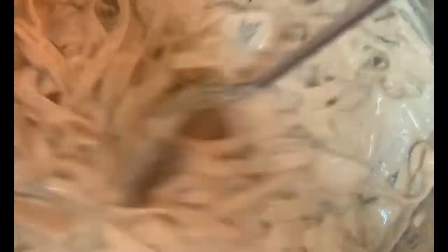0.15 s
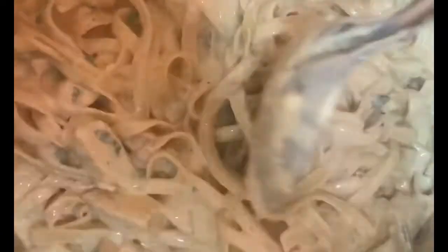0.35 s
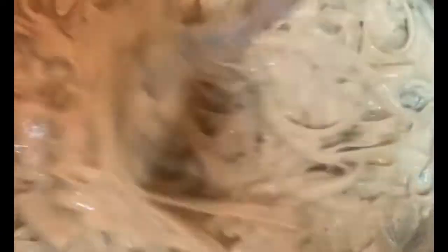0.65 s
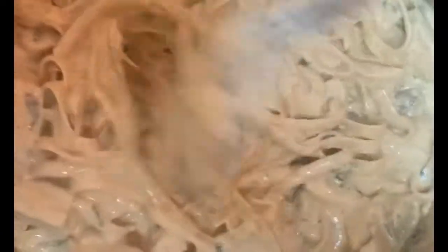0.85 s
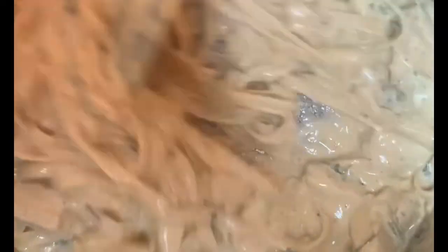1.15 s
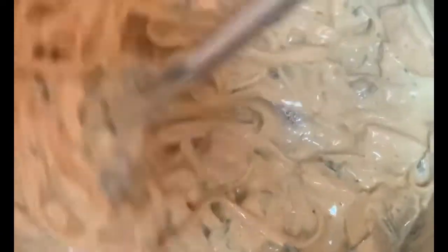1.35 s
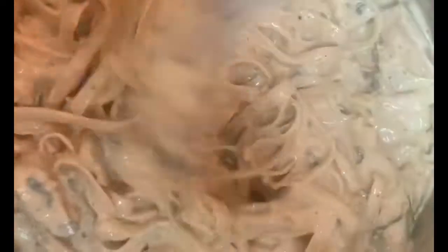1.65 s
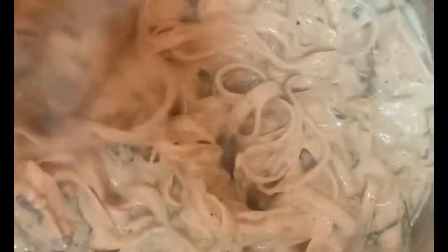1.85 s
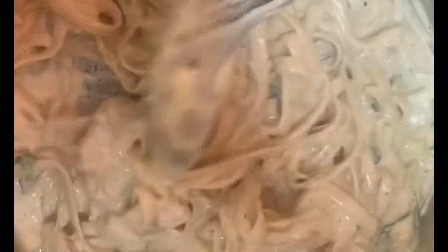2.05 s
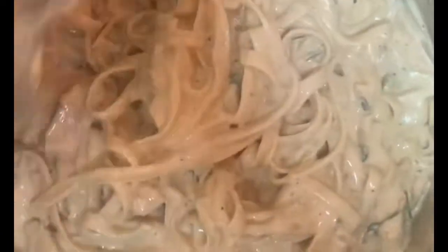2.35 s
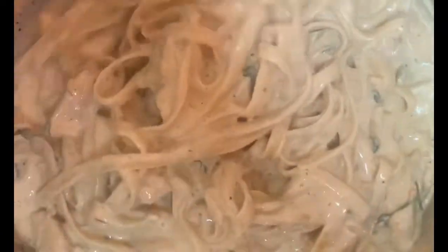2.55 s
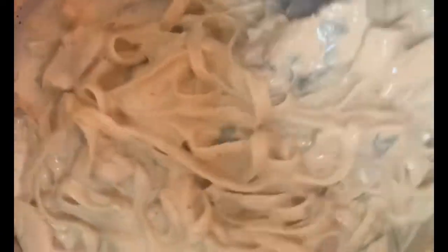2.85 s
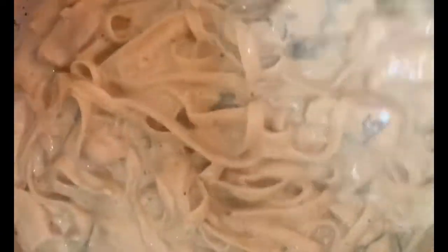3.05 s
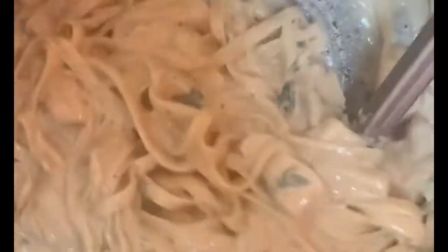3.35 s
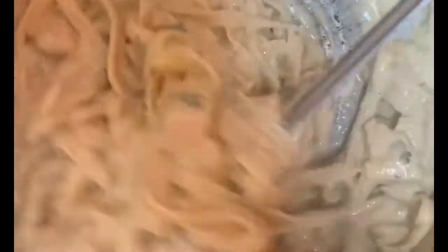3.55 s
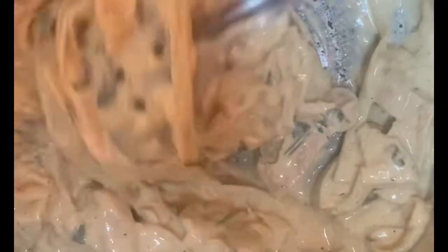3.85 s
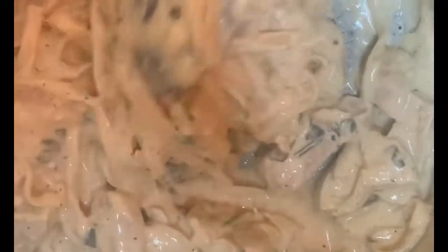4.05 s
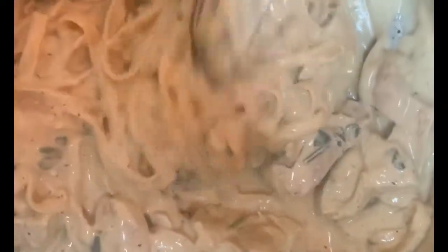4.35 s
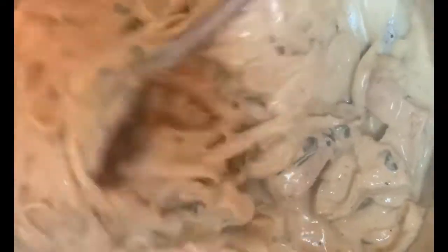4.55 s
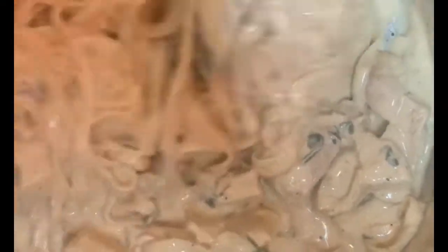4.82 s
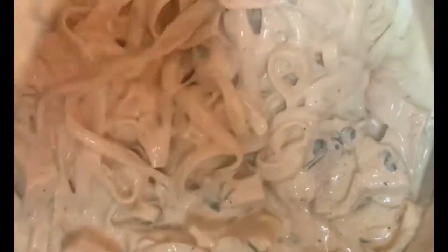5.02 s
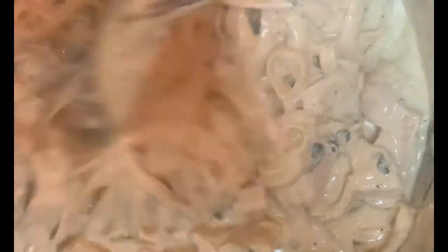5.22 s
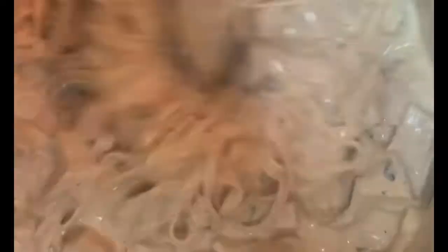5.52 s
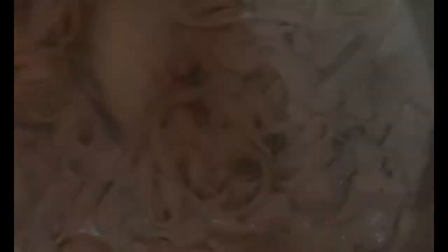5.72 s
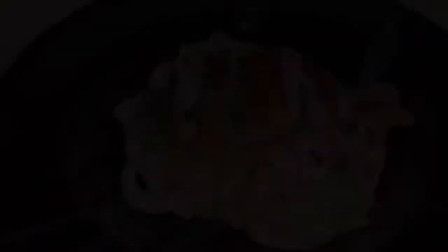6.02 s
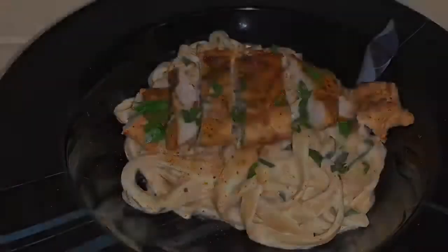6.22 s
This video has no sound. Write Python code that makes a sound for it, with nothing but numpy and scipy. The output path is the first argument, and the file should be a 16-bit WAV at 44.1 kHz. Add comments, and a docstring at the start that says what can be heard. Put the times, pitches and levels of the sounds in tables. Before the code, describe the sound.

Close-up stirring of saucy noodles: soft scrapes, faint fizzing and crackles, one hard metal knock, all above a low humming kitchen fan.

```python
"""Cream pasta under the cooker hood

A small kitchen, two microphone ports close to the pan: a steel spoon stirs pasta through simmering cream.
Blows ring pan and steel as decaying sines; scrapes are dense random slips through filters and resonances.
Swarms of gliding bubbles, ticks and noise make the sauce fizz, snap and squelch.
Behind, the hood hums and whines in wavering tones over filtered air noise.
The room answers with a short noise tail, and everything is faded to silence just before the end."""
import sys
import numpy as np
from scipy import signal
from scipy.fft import rfft, irfft
from scipy.io import wavfile
from scipy.ndimage import uniform_filter1d, map_coordinates

SR = 44100
rng = np.random.default_rng(int(sys.argv[2]) if len(sys.argv) > 2 else 0)


def master_out(mix):
    """Clip the mix to full scale and print it as 16-bit PCM to the path in sys.argv[1]."""
    frames = np.transpose(np.atleast_2d(mix))
    ceiling = np.clip(frames, -1, 1)
    pcm = np.round(ceiling * 32767).astype(np.int16)
    wavfile.write(sys.argv[1], SR, pcm)


N = 281177
TIME = np.arange(N) / SR
FREQ = np.fft.rfftfreq(N, 1 / SR)


def undb(db):
    """Decibels to gain."""
    return 10 ** (np.asarray(db) / 20)


def unit(x):
    """Scale to a standard deviation of 1."""
    return x / np.std(x)


def colour(x, spectrum):
    """Shape a sound by (f/Hz, level/dB) points, joined along a logarithmic frequency axis."""
    hz, db = np.transpose(spectrum)
    gain = undb(np.interp(np.log(FREQ + 1), np.log(hz), db))
    return irfft(rfft(x) * gain, N)


def resonate(x, hz, width):
    """Two-pole band-pass, as one damped resonance."""
    return signal.lfilter(*signal.iirpeak(hz, hz / width, fs=SR), x)


def walk(rate):
    """Smoothed random wandering with a spread of 1, drawn anew about `rate` times a second."""
    size = int(SR / rate)
    steps = np.repeat(rng.standard_normal(N // size + 1), size)
    return unit(uniform_filter1d(steps, size)[:N])


def drift(x, share, rate):
    """Let the pitch wander by a small share, by reading the sound at a varying speed."""
    speed = walk(rate)
    lead = np.cumsum(speed - uniform_filter1d(speed, SR // 4)) * share
    return map_coordinates(x, [np.arange(N) + lead], order=1)


def add(track, s, sound):
    """Mix a short sound in at time s."""
    i = int(s * SR)
    track[i:i + len(sound)] += sound[:N - i]


def decay(t, t60):
    """Exponential decay that falls 60 dB in t60 seconds."""
    return np.exp(-np.log(1000) * t / t60)


def ring(modes, crack, crack_t60, low_hz, top_hz):
    """A tapped body answers with decaying modes and a brief crack of dense, band-limited noise."""
    t = TIME[:SR // 3]
    tones = 0
    for k, (hz, db, t60) in enumerate(modes):
        sign = (-1) ** k
        tones = tones + sign * undb(db) * np.sin(2 * np.pi * hz * t) * decay(t, t60)
    band = signal.butter(3, [low_hz, top_hz], "band", fs=SR, output="sos")
    noise = unit(signal.sosfilt(band, rng.standard_normal(len(t))))
    return tones + crack * noise * decay(t, crack_t60)


def bubble(hz, cycles, glide):
    """A bubble rings down over about `cycles` periods while its pitch rises by the share `glide`."""
    age = np.linspace(0, 1, int(cycles * SR / hz) + 4)
    phase = 2 * np.pi * cycles * (age + glide * age ** 2 / 2)
    return np.sin(phase) * np.exp(-np.log(300) * age)


def bubbles(count, low_hz, high_hz, cycles, spread_db, glide):
    """A swarm of bubbles at random times and pitches, many faint and a few loud."""
    out = np.zeros(N)
    for when, pitch, size, life in rng.random((count, 4)):
        big_db = -spread_db * np.log(size + .01)
        hz = low_hz * (high_hz / low_hz) ** pitch
        add(out, when * TIME[-1], undb(big_db) * bubble(hz, cycles * (.5 + life), glide))
    return out


# spoon meets pan, levels before softening:
# (t/s, pan level/dB, steel level/dB, brightness cutoff f/Hz, time constant of food and hand muting the steel/s)
BLOWS = [(0.9012, -16, -18.5, 3800, .008), (1.085, -18, -26, 2400, .01), (1.256, -13, -27, 2600, .01),
         (1.276, -14.5, -24.5, 3200, .01), (1.325, -17.5, -31, 2000, .01), (1.346, -16, -36, 2000, .01),
         (1.381, -20.5, -30, 2500, .01), (1.8012, 7.5, -6, 9100, 0.006), (2.2025, -9, 1, 14100, 0.2),
         (2.2843, -13.5, -22.5, 2030, .01), (2.2982, -14.5, -12.5, 8000, .014),
         (2.305, -11, -15.5, 3000, .008), (2.323, -17.5, -21.5, 3000, .006),
         (2.3755, -17, -32, 4000, 0.0088), (2.387, -14, -28, 3050, .008), (2.445, -24, -20, 9000, .004),
         (2.4915, -21, -14, 9000, 0.0053), (2.517, -16, -35, 5000, .005), (2.654, -18, -20.5, 5000, .01),
         (2.672, -20.5, -27.5, 2200, .008), (2.688, -19, -30, 2200, .008), (2.71, -19, -26.5, 2500, .008),
         (3.2218, -10, -13, 12000, 0.0081), (3.715, -14.5, -15, 2600, 0.018),
         (5.1477, -16.5, -38, 1990, .01)]
# the pan, damped by its load: (f/Hz, level/dB, t60/s)
PAN_MODES = [(606, -31, 0.15), (721, -20.5, 0.075), (1020, -19, 0.02), (1135, -17.5, 0.032),
             (1263, -21, 0.04), (1556, -22, 0.078), (1658, -20, 0.046), (1750, -18.5, 0.025),
             (2140, -28.5, .025), (2780, -35.5, 0.055), (3270, -29.5, 0.021), (3920, -24, 0.031)]
# bare steel, before muting: (f/Hz, level/dB, t60/s)
STEEL_MODES = [(604, -38, 0.13), (1039, -30.5, 0.11), (1240, -35, .18), (1400, -26.5, 0.1),
               (1590, -31.5, .1), (1940, -34, .15), (2400, -19.5, 0.17), (2460, -23.5, 0.035),
               (3070, -24.5, .05), (3300, -30, 0.33), (4220, -17.5, 0.08), (4256, -23, 0.09),
               (4500, -21, 0.066), (4630, -19, .09), (5200, -23, 0.058), (5200, -22, .04),
               (5483, -18.5, 0.11), (6550, -15, 0.076), (6735, -19.5, .05), (6900, -19, 0.059),
               (7920, -24.5, 0.12), (8100, -24, 0.035), (8650, -25, .045), (9100, -23, 0.04),
               (10250, -26.5, 0.055), (11140, -30, .05), (11900, -30, .04), (13710, -27.5, 0.035),
               (14850, -25.5, .04)]
# single resonances of pan and spoon that ring on: (t/s, f/Hz, level/dB, t60/s)
RINGS = [(1.087, 611, -24, 0.25), (1.086, 1660, -28.5, 0.029), (1.256, 720, -18.5, 0.0516),
         (2.5, 2331, -24.5, 0.11), (2.5, 2850, -21.5, 0.053), (2.298, 4690, -26, 0.1003),
         (2.654, 910, -23.5, 0.075), (3.223, 850, -36, 0.23), (3.717, 1632, -38.5, 0.45),
         (3.716, 872, -19, 0.033), (3.716, 2000, -29, 0.093), (3.716, 2724, -33, 0.11),
         (3.715, 3700, -26, .028), (3.716, 4150, -27, .07)]
BOUNCE_S, BOUNCE_DB = .0036, -12  # delay and level of the one bounce, relative to its blow


def knocks():
    """Each blow clicks and rings pan and steel; food dulls it and mutes the steel; a weak bounce follows."""
    out, t = np.zeros(N), TIME[:SR // 2]
    for s, pan_db, steel_db, bright_hz, mute_s in BLOWS:
        click = ring([], crack=.11, crack_t60=.014, low_hz=1800, top_hz=9500)
        pan = click + ring(PAN_MODES, crack=0.1, crack_t60=0.06, low_hz=650, top_hz=2200)
        steel = ring(STEEL_MODES, crack=0.18, crack_t60=0.042, low_hz=1702, top_hz=14000)
        muted = steel * np.exp(-TIME[:len(steel)] / mute_s)
        soft = signal.butter(1, min(bright_hz, SR * .45), fs=SR)
        blow = signal.lfilter(*soft, undb(pan_db) * pan + undb(steel_db) * muted)
        add(out, s, blow)
        add(out, s + BOUNCE_S, undb(BOUNCE_DB) * blow)
    for s, hz, db, t60 in RINGS:
        add(out, s, undb(db) * np.sin(2 * np.pi * hz * t) * decay(t, t60))
    return out


PRESS_S = 0.017  # the spoon bears down this long before a stroke's start


def pressure(start, hold, ease):
    """Force of one stroke: the spoon bears down, holds and eases off exponentially."""
    onset = np.clip(1 + (TIME - start) / PRESS_S, 0, 1)
    return onset * np.exp(-np.maximum(TIME - start - hold, 0) / ease)


# strokes of the spoon: (start t/s, hold/s, time constant of easing off/s,
# rubbing through food level/dB, gritty steel contact level/dB, singing of the pressed metal level/dB)
STROKES = [(.005, 0.046, 0.046, -33, -55, -56), (1.083, .03, .035, -44, -58, -54),
           (1.256, 0.11, .03, -37.5, -51.5, -51), (1.79, 0.031, 0.02, -42, -39.5, -37.5),
           (2.229, 0.04, .025, -40, -40, -41), (2.301, 0.026, 0.037, -32, -38, -43),
           (2.42, .125, 0.048, -37.5, -34.5, -34.5), (2.559, 0.044, 0.016, -39, -35.5, -28.5),
           (2.648, 0.062, .06, -33.5, -46, -41.5), (2.995, 0.09, 0.081, -39.5, -50.5, -48.5),
           (3.715, .05, 0.04, -51, -52, -49), (4.51, .04, .03, -45, -58, -62),
           (5.128, 0.048, 0.03, -40.5, -58, -58), (5.295, 0.041, .04, -42, -55, -57)]
# resonances of spoon and pan pressed together: (f/Hz, width/Hz, mean level/dB relative to each other)
PRESSED = [(1054, 40, -4), (1250, 27, 3.5), (1494, 70, -6), (1690, 40, -5.5), (1943, 20, 1),
           (2424, 22, -8.5), (2723, 14, 1), (2900, 25, -2.5), (3015, 16, 2), (3250, 25, -9), (3413, 98, -3),
           (3575, 31, -0.5), (3990, 50, -1), (4100, 60, -4), (5200, 80, -9.5), (5130, 70, -4.5),
           (5670, 40, -3.5), (5950, 60, -3), (6300, 40, -5.5), (7000, 110, -2), (8300, 67, -3),
           (10400, 200, -4.5)]
# colour of the gritty contact: (f/Hz, relative level/dB)
GRIT = [(500, -13), (1500, 9), (3200, 6), (4400, 4.5), (5300, 6.5), (6700, 10), (7500, 4.5), (8300, -8.5),
        (9500, -2), (11000, 2), (12500, 2), (15500, -9)]
# colour of rubbing through food: (f/Hz, relative level/dB)
RUB = [(200, -7), (330, 10), (500, 13), (900, 4.5), (1150, 2.5), (1450, 5.5), (2000, 0), (3000, -12.5),
       (6000, -28), (16000, -27.5)]
SLIPS_PER_S, JUDDER_DB = 12000, 1.5  # mean slip rate; spread of the slips' wavering strength
SING_WAVER_DB, SING_DRIFT = 2.2, .003  # spread of each resonance's level; share of its pitch drift


def scrape():
    """The edge sticks and slips, bursting wet pockets; resonances waver as the contact point travels."""
    strokes = [undb(levels)[:, None] * pressure(start, hold, ease) for start, hold, ease, *levels in STROKES]
    rub, bite, sing = np.max(strokes, axis=0)  # the strongest stroke counts at each moment

    slipping = rng.random(N) < SLIPS_PER_S / SR
    slips = rng.choice([-1, 1], N) * slipping * undb(JUDDER_DB * walk(350))

    singing = np.zeros(N)
    for hz, width, db in PRESSED:
        level = undb(db + SING_WAVER_DB * walk(30))
        singing += level * unit(drift(resonate(slips, hz, width), share=SING_DRIFT, rate=25))

    chirps = bubbles(count=9000, low_hz=3516, high_hz=8970, cycles=100, spread_db=4.5, glide=.02)
    grit = unit(colour(unit(slips) + .5 * unit(chirps), GRIT))

    pockets = bubbles(count=2500, low_hz=520, high_hz=2570, cycles=8, spread_db=2.5, glide=0.12)
    wet = unit(colour(.7 * unit(slips) + .7 * unit(pockets), RUB))
    return rub * wet + bite * grit + sing * unit(singing)


# sizzle flares as the spoon uncovers hot metal: (t/s at the height, level/dB, time constant of dying away/s)
FLARES = [(0.389, -52.5, .08), (.58, -48, 0.05), (0.961, -48, .08), (1.06, -50, .08), (1.39, -45.5, .08),
          (1.85, -56, 0.073), (2.27, -34.5, .03), (2.335, -33.5, .012), (3.039, -50.5, 0.065),
          (3.611, -50.5, .08), (3.78, -47.5, .06), (4.381, -46, .08), (4.68, -49.5, .08), (5.1, -50.5, .08),
          (5.439, -47, .08), (5.81, -47, .08)]
FLARE_RISE_S = 0.035  # time constant of swelling
SIMMER_DB = -52.5  # steady part of the boiling strength


def sizzle():
    """Strength of the boiling: a steady simmer and swelling flares, summed as powers."""
    power = undb(SIMMER_DB) ** 2
    for s, db, fall_s in FLARES:
        shape = np.exp(-np.maximum((s - TIME) / FLARE_RISE_S, (TIME - s) / fall_s))
        power = power + (undb(db) * shape) ** 2
    return np.sqrt(power)


# colour of the fizz: (f/Hz, relative level/dB)
FIZZ = [(500, -28.5), (2000, 0), (3800, 9), (6000, -5), (7500, -2.5), (10600, 2.5), (11100, -2),
        (13000, -1.5), (15500, -7)]
# colour of the squelching: (f/Hz, relative level/dB)
SQUELCH = [(200, -6.5), (480, 16), (900, 8), (1150, -4.5), (1500, -2), (2000, 5), (3000, -19),
           (6000, -28.5), (16000, -27.5)]


def sauce(boil):
    """Tiny steam bubbles hiss, bigger ones crackle in spurts; air pockets squelch and plop between noodles."""
    ticks = bubbles(count=3000, low_hz=4400, high_hz=13300, cycles=20, spread_db=3.0, glide=.06)
    spurts = undb(6 * walk(30))
    bursts = rng.random(N) < 350 * spurts / SR
    strength = undb(4.5 * np.minimum(rng.exponential(size=N), 4))
    crackle = bursts * rng.choice([-1, 1], N) * strength
    hiss = rng.standard_normal(N)
    fizz = unit(colour(unit(ticks) + 0.7 * unit(crackle) + 1.1 * hiss, FIZZ))
    fizzing = fizz * boil * undb(2.5 + 0.84 * walk(25))

    squelch = bubbles(count=2400, low_hz=570, high_hz=3000, cycles=2.3, spread_db=4.0, glide=0.14)
    squelching = unit(colour(squelch, SQUELCH)) * undb(-51.5 + 1.2 * walk(15))
    plops = bubbles(count=170, low_hz=376, high_hz=1400, cycles=15, spread_db=4.0, glide=.12)
    return fizzing + squelching + undb(-55) * unit(plops)


# random small snaps: middle and full range of nominal level, and range of pitch
SNAP_DB, SNAP_SPREAD_DB, SNAP_LOW_HZ, SNAP_HIGH_HZ = -42.5, 10.5, 4840, 14000


def random_snaps(boil, count):
    """Rows (t/s, nominal level/dB, f/Hz) of random small snaps, as frequent as the boiling is strong."""
    when, size, pitch = rng.random((count, 3)).T
    s = np.interp(when, np.cumsum(boil) / np.sum(boil), TIME)
    db = SNAP_DB + SNAP_SPREAD_DB * (size - .5)
    hz = SNAP_LOW_HZ * (SNAP_HIGH_HZ / SNAP_LOW_HZ) ** pitch
    return list(zip(s, db, hz))


# single snaps, ticks and small taps in the pan, loud and soft:
# (t/s, nominal level/dB before trims and low cut, f/Hz)
SINGLE_SNAPS = [(.0863, -35, 6500), (.151, -33, 8800), (0.362, -29, 10400), (0.4015, -30, 9250),
                (.5063, -33, 8060), (0.5344, -32, 7000), (.554, -34, 11500), (.5829, -27, 11540),
                (.596, -37, 11000), (.892, -31, 8700), (1.0237, -30, 7900), (1.142, -31, 11540),
                (1.2946, -41, 7500), (1.384, -28.5, 5130), (1.781, -24, 8100), (1.8883, -33, 6190),
                (1.9511, -36, 7500), (2.131, -38, 8800), (2.9737, -34, 7950), (3.068, -27, 9900),
                (3.362, -38, 12000), (3.398, -30, 9700), (3.521, -27, 3400), (3.603, -36, 12500),
                (3.627, -24.5, 2550), (3.634, -31.5, 10850), (3.7675, -32, 7500), (3.796, -32, 7600),
                (3.862, -37, 6000), (4.2888, -34, 7000), (4.32, -35, 9000), (4.352, -26, 2150),
                (4.363, -29.5, 7000), (4.391, -27, 9000), (4.4439, -34, 6300), (4.4636, -30.5, 5640),
                (4.4719, -29.5, 11100), (4.588, -32, 5800), (4.66, -39, 6500), (4.669, -31, 3150),
                (4.676, -29, 4000), (4.679, -38, 6700), (4.786, -30, 6840), (4.9354, -34.5, 6540),
                (5.036, -33, 7700), (5.1169, -35, 6000), (5.19, -31, 3760), (5.285, -31.5, 6400),
                (5.3689, -31, 12100), (5.4042, -34, 7000), (5.4322, -30, 7400), (5.45, -25, 10300),
                (5.638, -34, 7500), (5.682, -36, 7800), (5.796, -22.5, 3720), (5.813, -35, 9560),
                (5.826, -30, 5600)]
SPIT_S, SPIT_WIDTH = 0.0022, 0.38  # noisy spit: time constant; bandwidth as a share of its pitch


def snaps(boil):
    """A sharp noisy spit and a brief ring at one pitch, as when a sauce film tears and its pocket opens."""
    out, t = np.zeros(N), TIME[:SR // 40]
    for s, db, hz in SINGLE_SNAPS + random_snaps(boil, count=45):
        tear = resonate(rng.standard_normal(len(t)), hz, min(SPIT_WIDTH * hz, SR / 3))
        spit = unit(tear) * np.exp(-t / SPIT_S)
        add(out, s, undb(db - 8.0) * spit)
        add(out, s, undb(db - 0.5) * bubble(hz, cycles=34, glide=0.049))
    return signal.sosfilt(signal.butter(2, 1700, "high", fs=SR, output="sos"), out)


# spectrum of the moving air: (f/Hz, density level/dB per Hz)
HOOD_AIR = [(20, -95), (36, -76), (50, -56), (90, -49.5), (125, -49), (155, -55.5), (270, -76), (430, -73),
            (850, -75.5), (1400, -77), (2200, -78.5), (3200, -86), (6000, -90), (16000, -118)]
# duct resonances: (f/Hz, width/Hz, rms level/dB)
DUCT = [(197.2, 30.2, -34), (350, 51, -42.5), (507, 59, -49), (610.5, 16, -55), (748, 70, -46)]
# overtones of the fan wheel: (f/Hz, mean rms level/dB)
WHINE = [(366.5, -48), (612, -54.5), (732, -54)]
HUM_HZ, HUM_DB = 119.8, -27.5  # mean pitch, mean rms level
WHINE_WAVER_DB = 2.5  # spread of each overtone's level


def hood():
    """The motor hums at twice the mains rate, the fan wheel whines unsteadily; air rumbles and rings the duct."""
    air = colour(rng.standard_normal(N), HOOD_AIR) * np.sqrt(SR / 2)  # per-Hz density to full band
    duct = np.zeros(N)
    for hz, width, db in DUCT:
        stage_width = 1.48 * width  # two stages in a row narrow the band again
        once = resonate(rng.standard_normal(N), hz, stage_width)
        duct += undb(db) * unit(resonate(once, hz, stage_width))

    hum_tone = np.sqrt(2) * np.sin(2 * np.pi * HUM_HZ * TIME + 0.2 * walk(8.8))
    hum = hum_tone * undb(HUM_DB + 2.0 * walk(22))
    whine = np.zeros(N)
    for hz, db in WHINE:
        tone = np.sqrt(2) * np.sin(2 * np.pi * hz * TIME + 0.95 * walk(14))
        whine += tone * undb(db + WHINE_WAVER_DB * walk(18))
    return air + duct, hum + whine


def kitchen(x, t60, wet_db, dull_hz):
    """Direct sound plus a short diffuse tail that differs at the two ports."""
    t = TIME[:SR // 2]
    tail = rng.standard_normal((2, len(t))) * decay(t, t60) * (t > .004)  # first reflections after 4 ms
    tail = signal.lfilter(*signal.butter(1, dull_hz, fs=SR), tail / np.linalg.norm(tail[0]))
    tail = signal.sosfilt(signal.butter(3, 300, "high", fs=SR, output="sos"), tail)
    return x + undb(wet_db) * signal.fftconvolve(x[None], tail, axes=1)[:, :N]


def scene():
    """Spoon and sauce at the stove, and the hood's air, each with a room tail; hum and whine stay dry."""
    air, hum = hood()
    boil = sizzle()
    stove = kitchen(knocks() + scrape() + sauce(boil) + snaps(boil), t60=0.15, wet_db=-12.0, dull_hz=4500)
    fan = kitchen(air, t60=.3, wet_db=-3.5, dull_hz=3380) + hum
    return stove + fan


# phase by which the right microphone port lags: (f/Hz, lag/rad)
PORT_LAG = [(20, 0), (230, 0), (400, -.6), (800, -.4), (1500, .5), (3500, 1.6), (4750, 3.14), (6300, 6.2),
            (7450, 6.4), (9000, 9.4), (10650, 12.4), (11600, 12.7), (13200, 15.7), (14700, 18.7)]
# left port minus right port: (f/Hz, level/dB)
PORT_BALANCE = [(120, 1.25), (250, -2), (360, 7), (550, -0.5), (750, 5), (930, -14.5), (1100, 7),
                (1400, -1.5), (1900, 4), (2250, -1), (2400, -1.5), (2600, -0.5), (3000, 0.5), (15000, 0)]
# closing fade: (start t/s, silent t/s)
FADE = (5.869, 5.925)
TOP_HZ = 15800  # upper limit of the microphone channel


def record(dry):
    """The two ports hear out of step and differently coloured; end faded, peaks rounded, top cut."""
    lag = np.interp(FREQ, *np.transpose(PORT_LAG))
    late = irfft(rfft(dry[1]) * np.exp(-1j * lag), N)
    left = colour(dry[0], [(hz, db / 2) for hz, db in PORT_BALANCE])
    right = colour(late, [(hz, -db / 2) for hz, db in PORT_BALANCE])
    ports = np.array([left, right]) * np.interp(TIME, FADE, [1, 0])
    rounded = ports / (1 + (ports / .92) ** 4) ** .25
    return signal.sosfilt(signal.ellip(10, .2, 80, TOP_HZ, fs=SR, output="sos"), rounded)


dry = scene()
out = record(dry)
master_out(out)
```